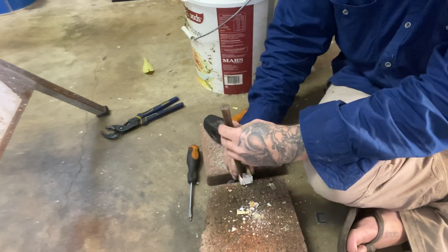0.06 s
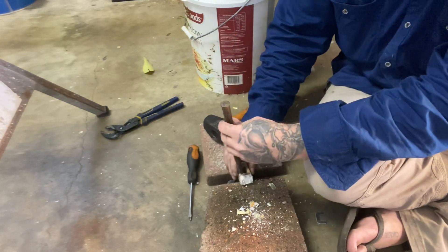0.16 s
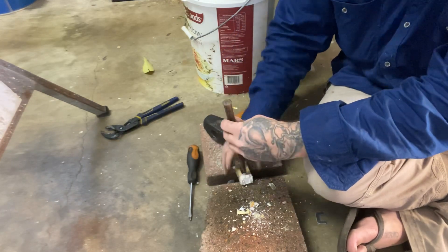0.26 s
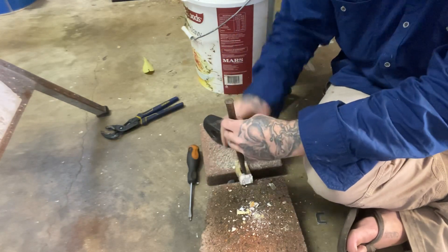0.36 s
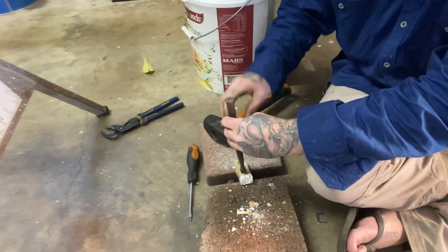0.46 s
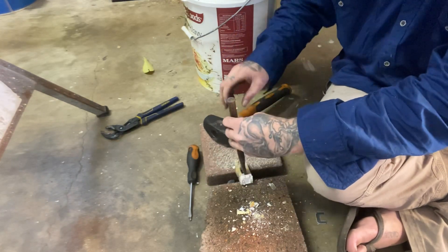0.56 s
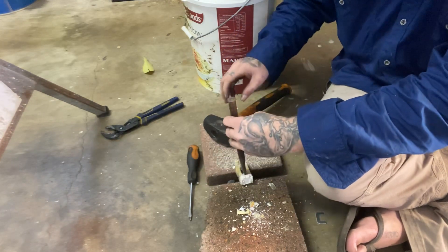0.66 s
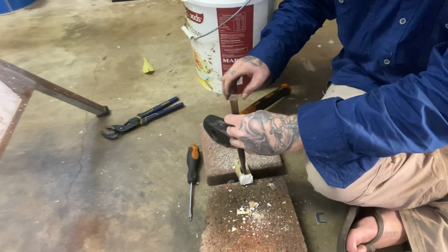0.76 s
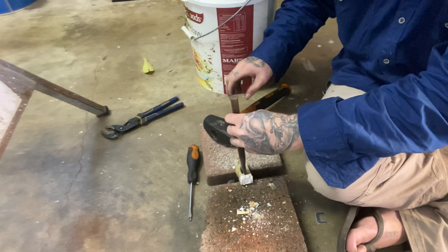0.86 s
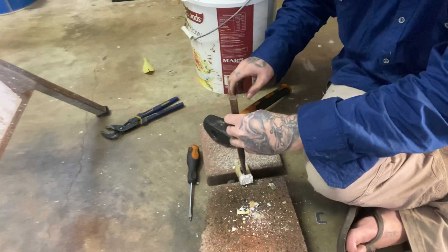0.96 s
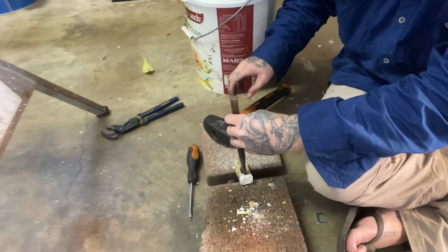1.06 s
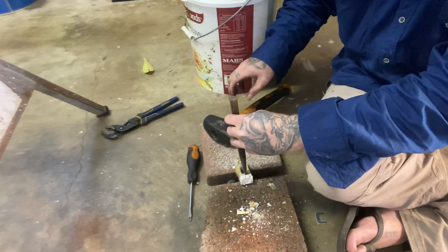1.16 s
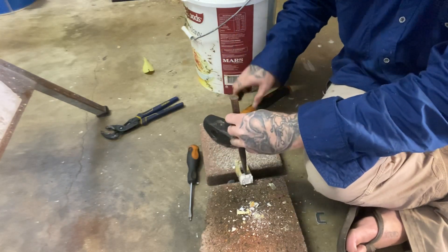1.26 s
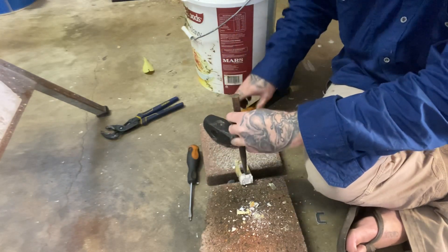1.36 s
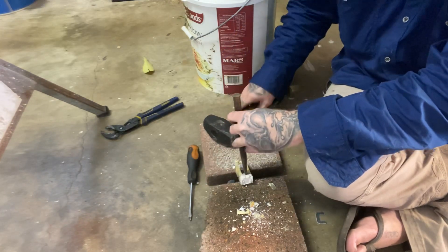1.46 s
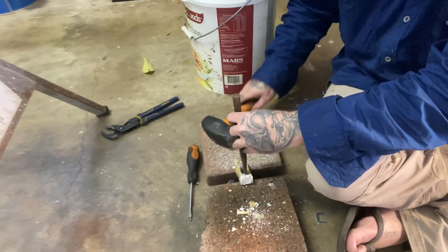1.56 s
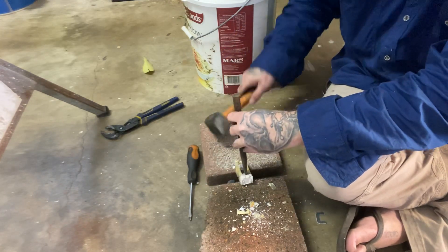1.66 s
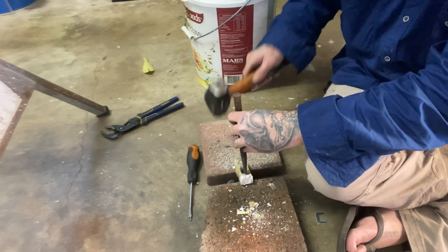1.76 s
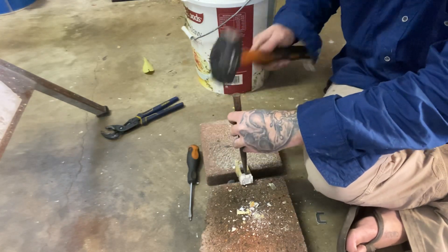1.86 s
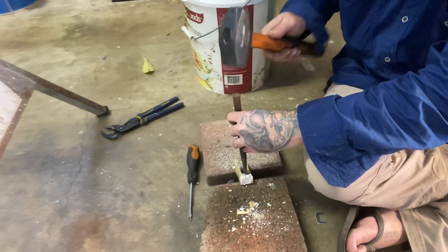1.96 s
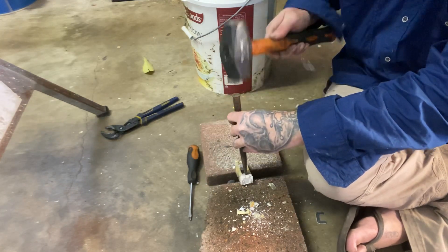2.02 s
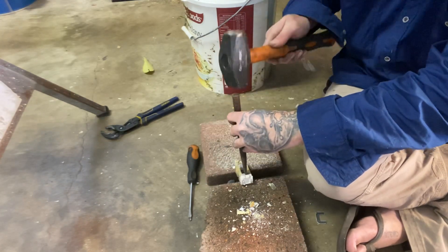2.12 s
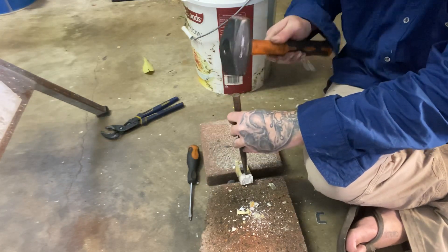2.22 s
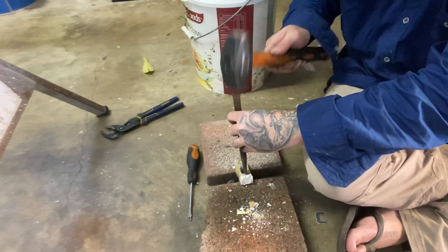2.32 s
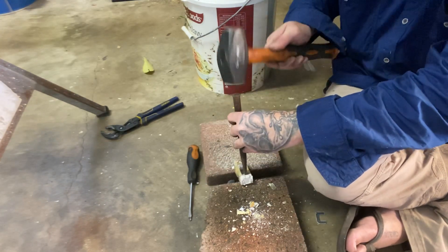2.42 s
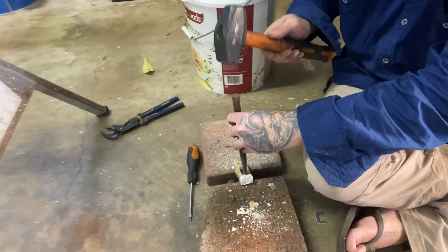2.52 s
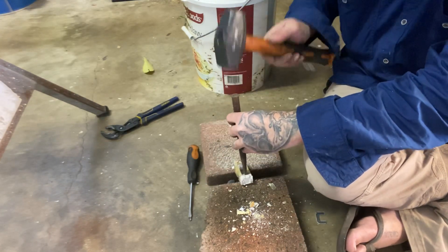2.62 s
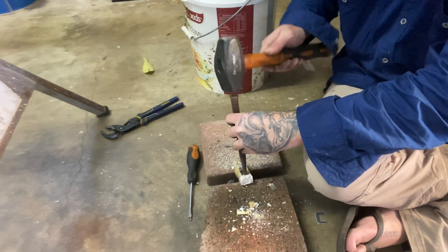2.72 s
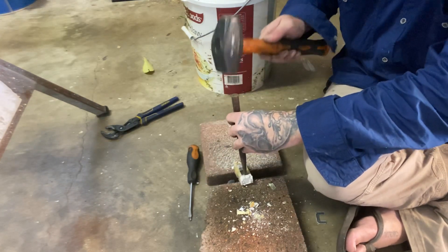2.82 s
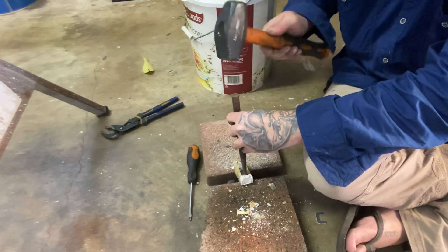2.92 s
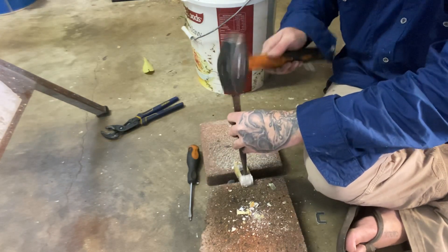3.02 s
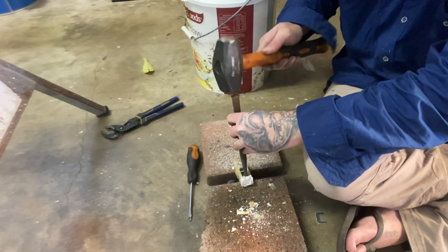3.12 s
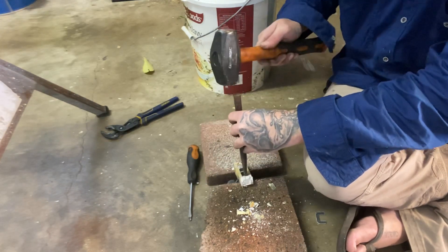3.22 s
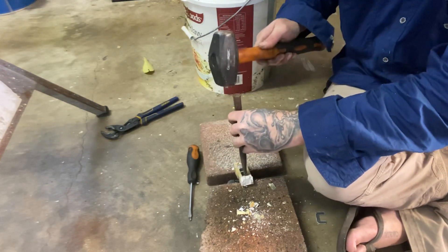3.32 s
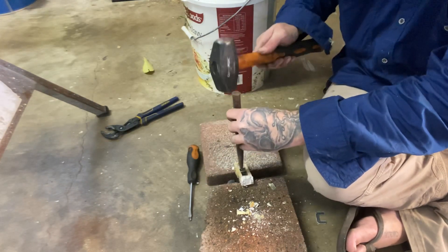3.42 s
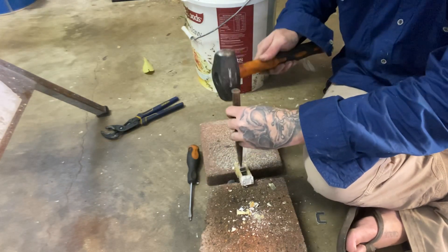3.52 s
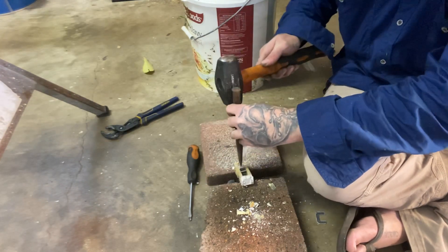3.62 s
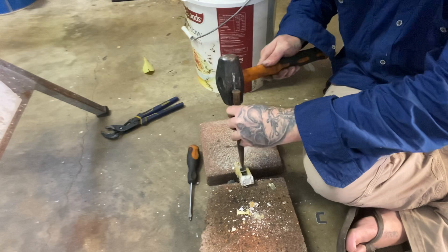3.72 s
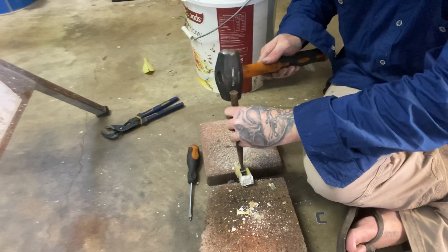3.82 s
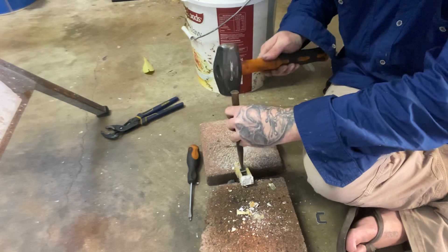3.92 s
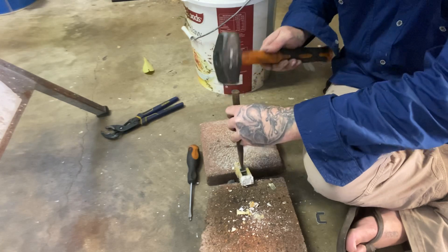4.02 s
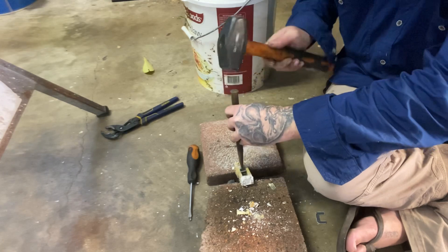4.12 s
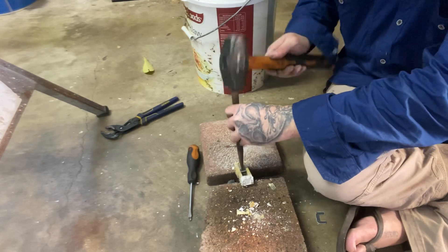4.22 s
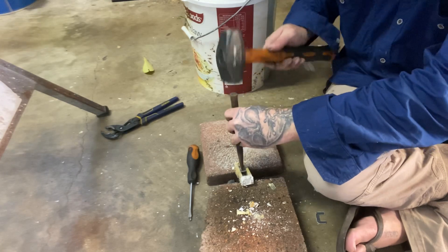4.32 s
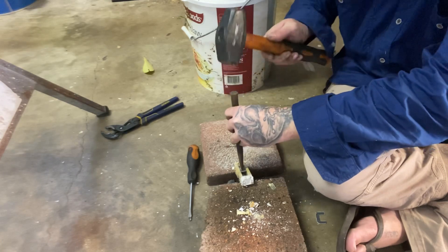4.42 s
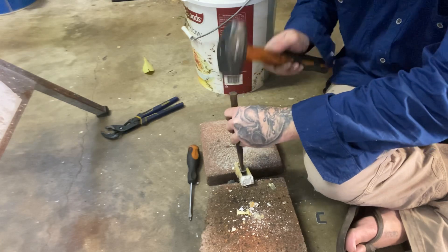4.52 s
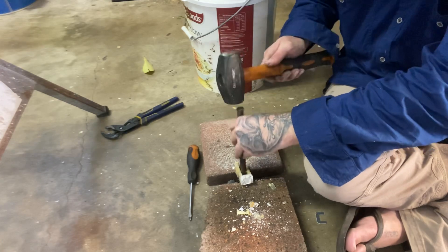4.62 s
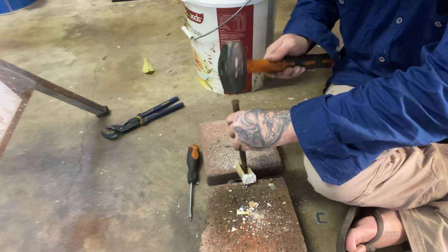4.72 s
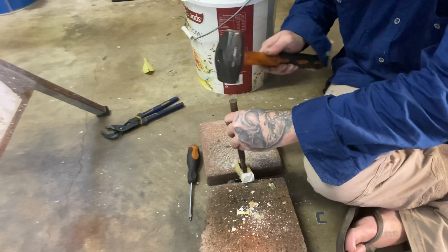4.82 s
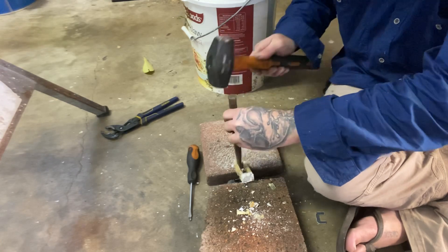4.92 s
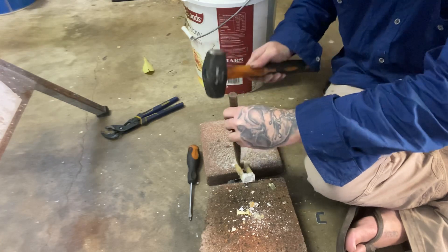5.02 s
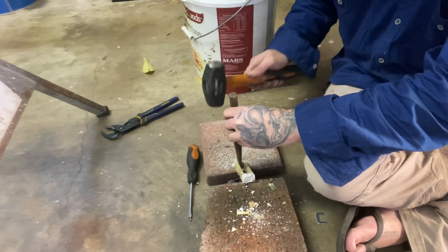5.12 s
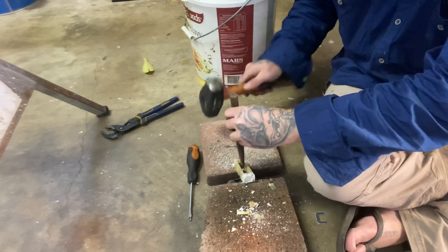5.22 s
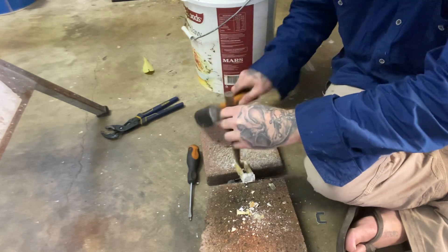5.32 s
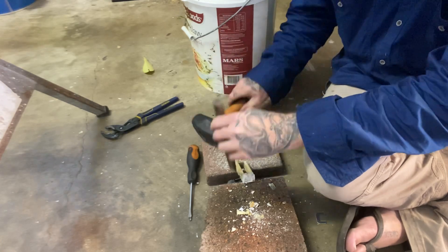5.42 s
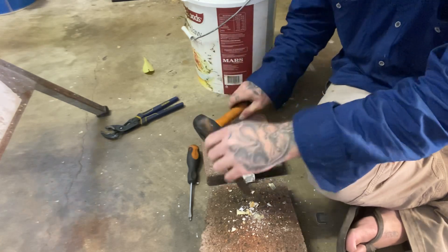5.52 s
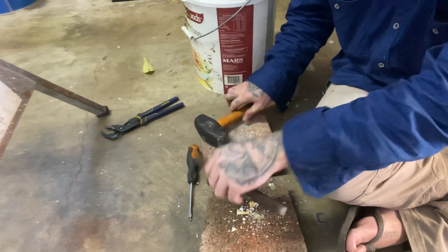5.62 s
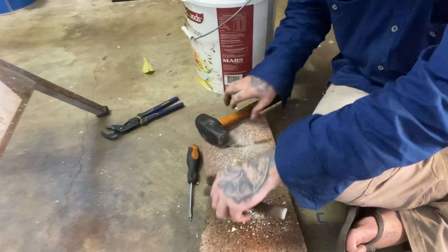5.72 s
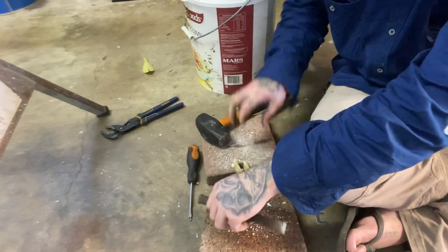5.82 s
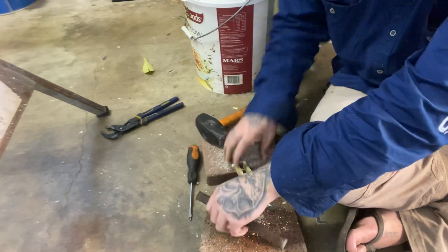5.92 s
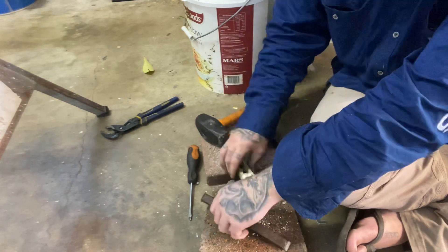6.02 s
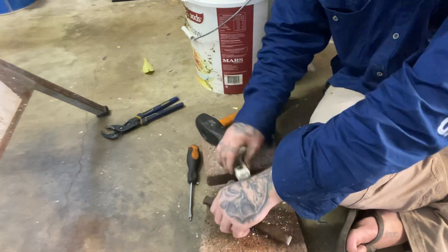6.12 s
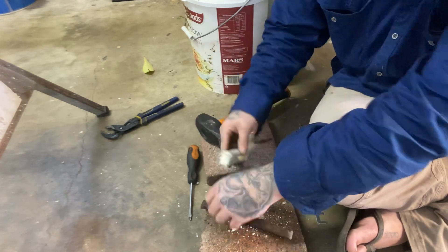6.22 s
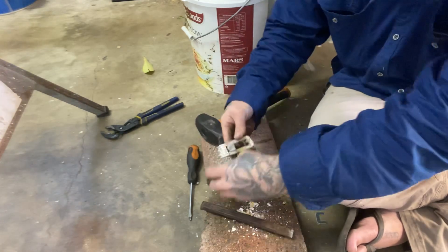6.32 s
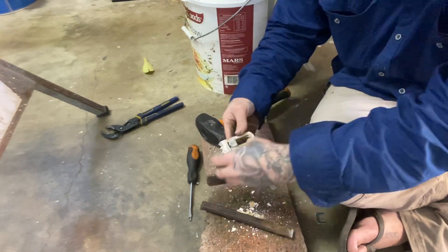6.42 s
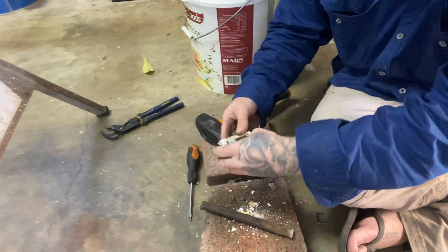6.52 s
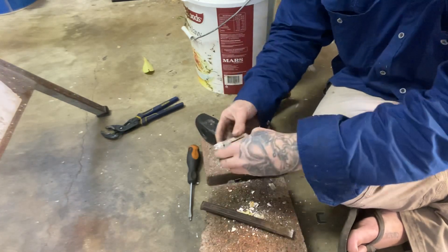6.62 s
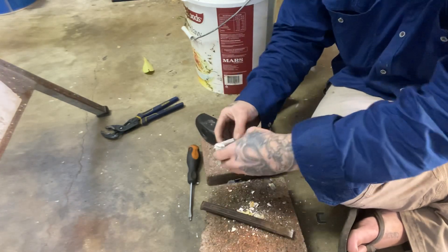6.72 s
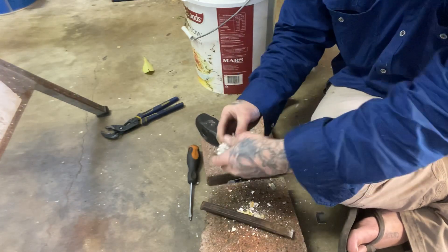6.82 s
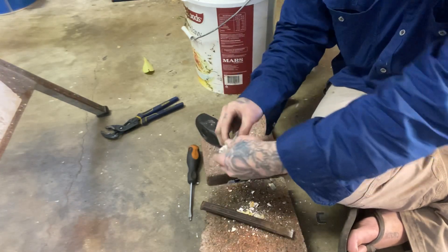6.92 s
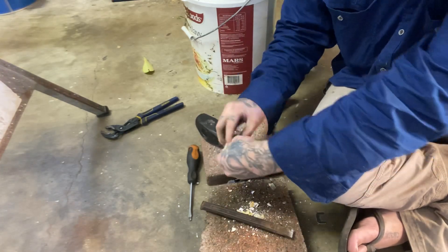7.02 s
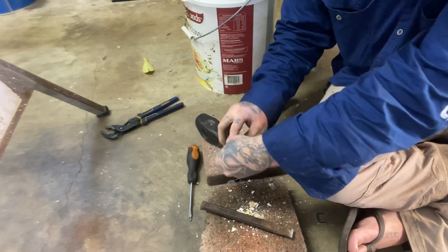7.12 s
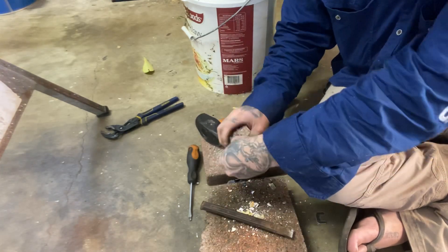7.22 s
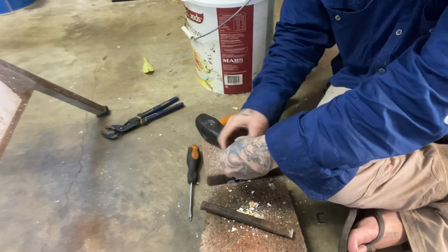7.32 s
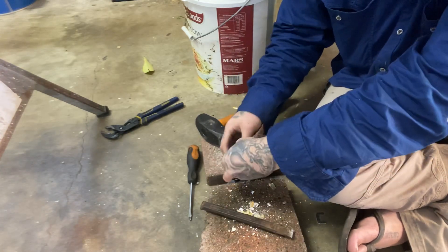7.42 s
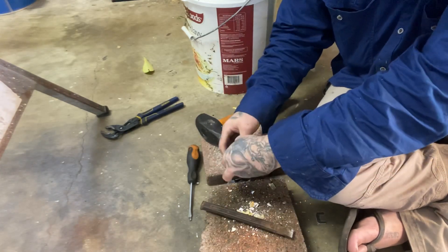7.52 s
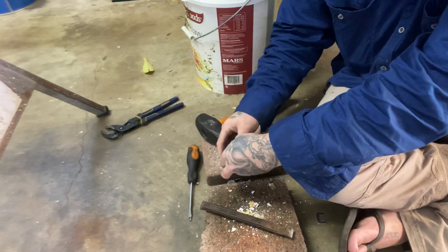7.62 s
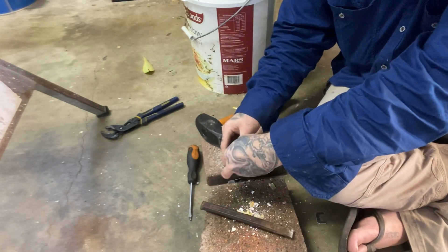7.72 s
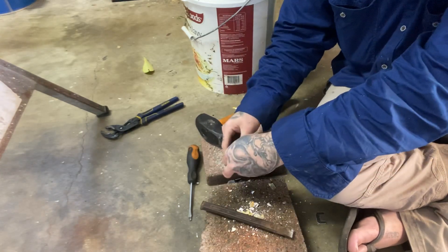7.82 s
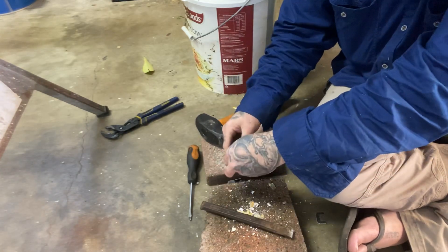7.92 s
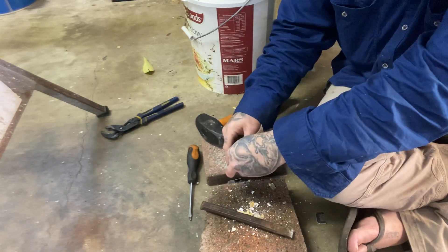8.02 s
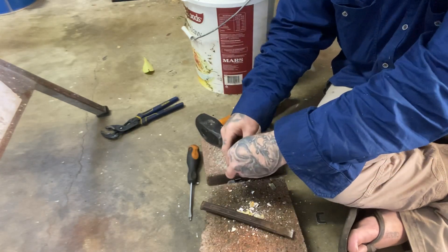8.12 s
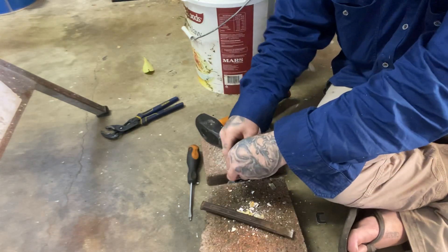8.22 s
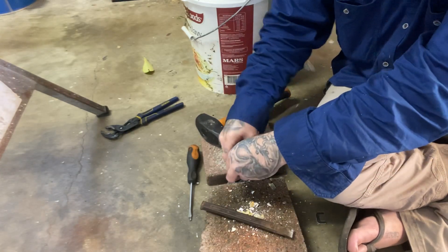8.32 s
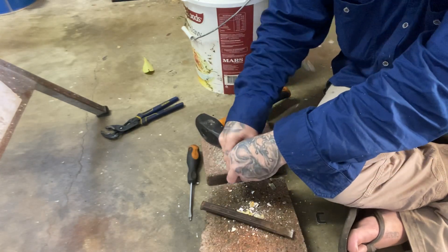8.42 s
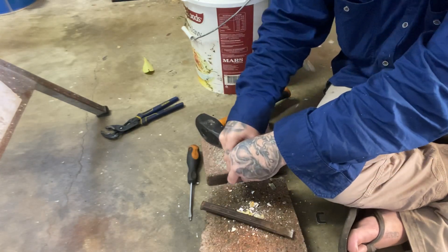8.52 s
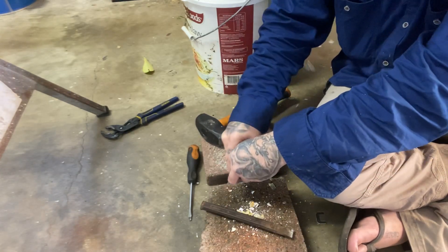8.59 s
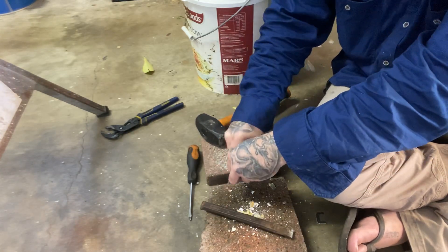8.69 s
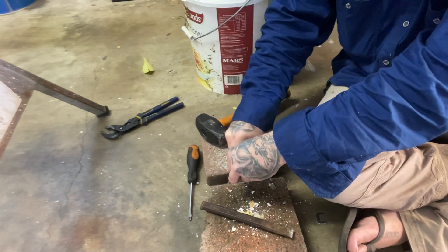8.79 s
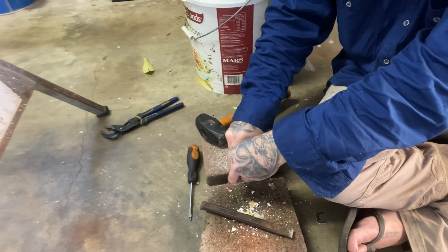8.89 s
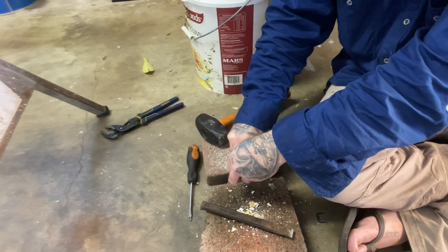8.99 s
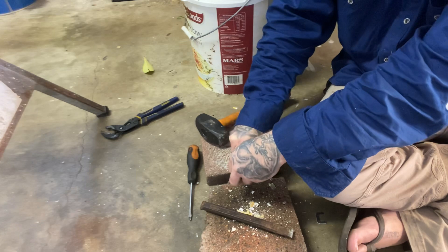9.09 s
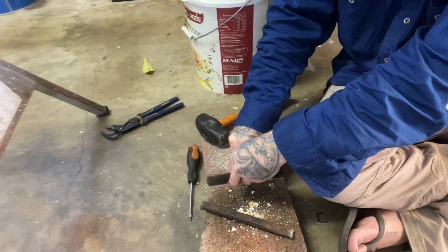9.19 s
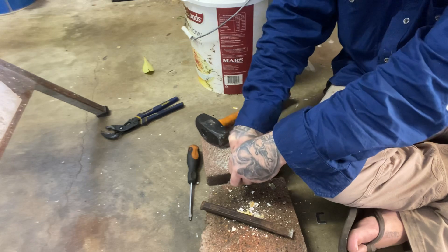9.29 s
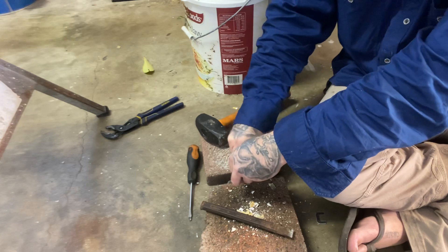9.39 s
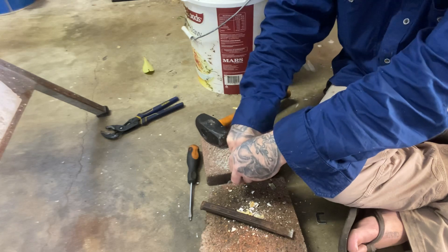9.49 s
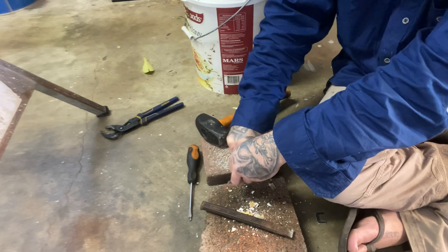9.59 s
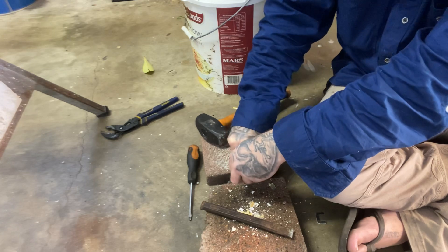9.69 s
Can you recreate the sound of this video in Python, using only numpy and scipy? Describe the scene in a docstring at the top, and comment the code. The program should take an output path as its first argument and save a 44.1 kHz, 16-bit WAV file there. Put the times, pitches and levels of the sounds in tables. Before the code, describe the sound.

A low hum and still air fill a bare garage with a short echo. For the first two seconds a faint bird rasps four times outside, while tools bump softly and one knocks down at about 1.6. At 2.4, 2.7 and 3.0 a hammer strikes a chisel held on a small metal casing on brick: each blow is a sharp steel crack with a brief ring, a brick knock and a floor thud. A light tap comes at 3.7, then two more blows at 4.2 and 4.6. Grit and metal splinters tinkle after each group. The hammer is put down with loud knocks around 5.5 and 5.7. The chisel drops at about 6 and rings brightly for a second. Afterwards there are only faint clicks, soft bumps, sleeve rustle and small scrapes on brick until about 9.5, with one more bird call near 7.4.

```python
"""A faint bird rasps outside a garage, over a low hum and the soft bumps of tools being handled.
Then a club hammer drives a cold chisel into a small metal casing on a brick: steel cracks, the brick
knocks, the concrete floor thuds, grit and splinters scatter. The hammer is put down, the chisel drops
and rings, and fingers pick at the casing with faint clicks. The bare room echoes it all."""
import sys
import numpy as np
from scipy import signal
from scipy.fft import rfft, irfft
from scipy.io import wavfile
from scipy.ndimage import uniform_filter1d

SR = 44100
rng = np.random.default_rng(int(sys.argv[2]) if len(sys.argv) > 2 else 0)


def wav_record(signal):
    """Record a signal, one row per channel, as 16-bit PCM in the file named by sys.argv[1]."""
    frames = np.transpose(np.atleast_2d(signal))
    bounded = np.clip(frames, -1, 1)
    # unit amplitude maps onto the largest positive 16-bit level
    quanta = np.round(bounded * 32767).astype(np.int16)
    wavfile.write(sys.argv[1], SR, quanta)


N = 429975

# garage reverberation: band_hz, level_db, t60_s
ECHO_BANDS = [(61, 4, 0.93), (160, 3.5, 0.51), (426, 3, 0.53), (1180, -5, 0.47), (2880, -0.5, 0.61),
              (7700, -2.5, 0.5), (15470, -10, 0.62)]
# microphone shading: freq_hz, left_minus_right_db
MIC_BALANCE = [(100, 4.5), (1000, 0), (2200, -4.5), (4500, -9), (8500, -1.5), (15000, -1)]

# modes: freq_hz, gain_db, t60_s
ROOM_MODES = [(71.4, -60, .7), (111, -58, 0.33), (165, -60.5, .3), (197, -59.5, 0.37), (278, -62, .45),
              (310, -65.5, 0.53), (362, -62.5, 0.35), (519, -61.5, 0.43), (570, -61.5, 0.63)]
SPLINTER_MODES = [(8075, -17, .15), (10873, -12, .16), (10760, -13, .11), (14883, -3, .16), (15040, 4, .14)]
HELD_CHISEL_MODES = [(1826, -7, 0.19), (1960, -16, 0.065), (2100, -12, .22), (2190, -7.5, .22),
                     (2290, -5.5, 0.099), (2506, 5, .09), (4583, -16, .26), (4990, -17.5, 0.084),
                     (5260, -16, .16), (6400, -16.5, 0.35), (6380, -13.5, .27), (8240, -15, .22),
                     (14150, -20.5, .22)]
# free chisel: freq_hz, tip_hit_db, flat_hit_db, t60_s, left_minus_right_db
FREE_CHISEL_MODES = [(1822, -3, -10.5, .24, -3), (2482, -13, -14, .95, -4), (3033, -22, -23, .4, 0),
                     (4688, -3.5, -5.5, 1.2, -6), (6335, -8, -19, .85, -4), (8037, -26, -26, .45, 0),
                     (8340, -2.5, -15, .3, 1), (11535, -31, -35, .5, 0), (15500, -34, -42, .4, 0)]
# brick and concrete: pitch_ratio, gain_db, t60_at_1khz_s
BRICK_MODES = [(0.631, -16, 0.035), (.85, -4, 0.02), (1.001, 11, 0.015), (1.169, -6, 0.018),
               (1.45, -10.5, 0.014), (1.75, -6, 0.013)]

# spectra: freq_hz, gain_db
AIR_EQ = [(20, -25), (45, -16.5), (75, 0.5), (134, -19), (204, -21), (285, -32.5), (422, -34), (1000, -39),
          (1400, -40), (4000, -46), (7500, -53.5), (10000, -53), (16000, -75.5)]
SLEEVE_EQ = [(60, -11.5), (200, -7), (400, 2), (650, -17.5), (1100, -14.5), (1800, -16), (4000, -19),
             (10000, -35)]
BUMP_EQ = [(40, -25.5), (100, -2), (190, 1), (290, -3.5), (400, 3.5), (560, -17), (1100, -22.5),
           (2200, -38), (6000, -54)]  # flesh and wood on brick
CLICK_EQ = [(200, -40), (700, -8.5), (2200, -3), (3500, -7), (6000, -10.5), (10000, -11), (13000, -25),
            (15500, -12)]
SLAB_EQ = [(30, -16), (70, 6.5), (110, 4.5), (180, -6), (330, 0), (900, -7.5), (1600, -24), (4000, -49)]  # concrete under a heavy tool
FLOOR_THUD_EQ = [(25, -34.5), (50, -10.5), (105, 2.5), (160, -6), (300, 0.5), (450, -3.5), (800, -13),
                 (1600, -29), (5000, -50.5)]
CRACK_EQ = [(30, -39), (150, -30), (600, -10.5), (1300, 2), (2100, 5), (3300, -5.5), (5000, -2),
            (6400, -0.5), (7400, -14), (8400, -8.5), (11000, -18.5), (12800, -32), (14500, -20),
            (16000, -18.5)]
AIR_SIDE_EQ = [(60, -9.5), (300, .5), (1500, 1)]
WHEEZE_EQ = [(900, -34), (2000, -8), (3600, 5.5), (5000, -8), (6200, -8), (12000, -35.5)]
RUB_BODY_EQ = [(250, -14), (420, 7), (700, -4), (1000, -2), (1350, -16.5), (1800, 4)]
RUB_TREBLE_EQ = [(2300, -4), (2700, 0), (3200, -6), (4000, -1), (4700, -4.5), (7000, -13), (14000, -48)]
BUMP_CLACK_EQ = [(1300, -3.5), (4000, -14)]
SPLINTER_TICK_EQ = [(500, -12), (2000, -8.5), (6000, 1.5), (11000, -1), (16000, -1)]
SOFT_CLACK_EQ = [(250, -3), (800, -3.5), (1800, 5), (4000, -8.5), (9000, -26)]
SOFT_CRACK_EQ = [(300, -6), (1700, 8.5), (2400, -3.5), (3000, 4), (3800, -1.5), (4500, -8.5),
                 (6000, -16.5), (10000, -33.5), (16000, -47.5)]
BRICK_EQ = [(150, -14.5), (500, -4.5), (1000, .5)]  # too small to radiate much bass

# bird calls: start_s, length_s, top_pitch_hz, level_db, second_voice_rel_db, octave_rel_db
BIRD_CALLS = [(0.023, 0.31, 3085, -54.5, 2.5, 1), (0.732, 0.23, 2994, -52.5, -3, 2),
              (1.261, 0.31, 2953, -56, -1.5, 3), (1.913, 0.18, 2736, -54.5, -20.5, 11),
              (3.57, .16, 2640, -72.5, -9, -24), (7.418, .3, 3143, -54.5, 4, -3.5)]
# arm movements: peak_s, level_db, rise_s, fall_s
REACHES = [(.02, -69, 0.28, 0.43), (1.2, -63, 0.27, 1.37), (3.9, -77.5, 0.33, 1.25),
           (4.88, -66, 0.095, 0.18), (5.4, -65.5, 0.19, 1.4), (7.3, -65.5, 0.58, 0.78),
           (9.3, -77, 0.95, 0.64)]
# casing slid over the brick: start_s, length_s, level_db, treble_db
RUBS = [(6.462, 0.14, -71.5, 12), (7.88, 0.052, -71, 3), (8.0, 0.055, -78, 12), (8.257, 0.07, -72, 2.5),
        (8.719, 0.63, -71.5, -26), (9.143, 0.3, -65.5, -0.5)]
# hands, handle and shaft bump: start_s, level_db, clack_rel_db, t60_s
BUMPS = [(0.218, -53.5, -37, 0.029), (0.581, -53.5, -9, 0.039), (1.099, -49.5, -20, 0.11),
         (1.22, -39, -11, 0.074), (1.409, -50, -26, 0.18), (1.600, -40.5, -26, 0.16),
         (2.047, -50.5, -18.5, 0.17), (6.106, -34, -4, 0.21), (6.829, -59, 0, 0.16),
         (7.154, -44, -5.5, 0.12), (8.757, -63, -9, 0.049)]
# casing snaps: start_s, level_db
SNAPS = [(.568, -57), (1.173, -64), (6.273, -55), (6.778, -59), (8.012, -53.5)]
# casing catches on the brick: start_s, level_db, release_after_s
CATCHES = [(7.3227, -43.5, .0062), (7.888, -56.5, .024)]
# splinters land: start_s, level_db
SPLINTER_LANDINGS = [(3.22, -47.5), (3.339, -40), (3.436, -54), (4.753, -51.5), (4.808, -35),
                     (4.930, -42.5)]
# steel set down: start_s, knock_db, knock_hz, thud_db, crack_db, rebound_after_s, rebound_rel_db
SET_DOWNS = [(1.6032, -30, 984, -46, -56, .045, -10.5), (5.4612, -13.5, 1064, -29, -23.5, 0.014, -4.5),
             (5.659, -21, 1090, -31.5, -39, 0.026, -11), (5.9498, -27.5, 783, -43, -31, 0.027, -17),
             (6.0989, -29, 1000, -47, -32.5, 0.026, -6.5)]
# chisel lands: start_s, level_db, flatness (0 tip, 1 flat), hand_damping_db_per_s, chatter_s
CHISEL_DROPS = [(5.9490, -22, 0, 75, .03), (6.0995, -25, 1, 0, .1)]
# hammer blows: start_s, crack_db, ring_db, brick_lag_s, crunch_db, crunch_t60_s,
# knock_db, knock_hz, thud_db
BLOWS = [(2.352, -19.5, -35, 0.0042, -22.5, .02, -12, 1180, -32.5),
         (2.697, -25.5, -36, 0.0027, -25, .02, -14, 1650, -20.5),
         (3.037, -18.5, -30, 0.0033, -21.5, .022, -17.5, 1723, -19),
         (3.7443, -57, -41.5, 0.0032, -63, 0.024, -53, 2273, -59),
         (3.933, -85, -60.5, 0.0022, -73.5, .02, -69.5, 2145, -64),
         (4.2334, -25, -33, 0.0076, -23, .1, -30, 1063, -38.5),
         (4.5709, -17.5, -26.5, .0142, -25.5, .02, -38.5, 1090, -40.5)]

SIDES = np.array([[1], [-1]])  # left, right


def undb(db):
    """Decibels to gain."""
    return 10 ** (np.asarray(db) / 20)


def lookup(table, hz, column=1):
    """Table column interpolated over log frequency."""
    rows = np.array(table, float)
    return np.interp(np.log(np.maximum(hz, 1)), np.log(rows[:, 0]), rows[:, column])


def colour(x, eq, size=4096):
    """Minimum-phase filter with the given spectrum."""
    cepstrum = irfft(np.log(undb(lookup(eq, np.fft.rfftfreq(size, 1 / SR)))))
    cepstrum[1:size // 2] *= 2
    cepstrum[size // 2 + 1:] = 0
    response = irfft(np.exp(rfft(cepstrum)))[:size // 2]
    return signal.oaconvolve(x, np.array(response, ndmin=x.ndim), axes=-1)[..., :x.shape[-1]]


def fade(t, t60_s):
    """Exponential decay, 60 dB in t60_s."""
    return np.exp(-np.log(1000) * t / t60_s)


def level(x, db):
    """Scales a hit to the energy of 10 ms at this level."""
    return x * undb(db) / np.sqrt(np.sum(x ** 2) / (SR / 100))


def add(track, start_s, x):
    """Mixes x into the track."""
    start = int(start_s * SR)
    count = max(0, min(x.shape[-1], N - start))
    track[..., start:start + count] += x[..., :count]


def waver(rate_hz, count):
    """Smooth random drift, spread near 1."""
    size = max(1, int(SR / rate_hz))
    drift = uniform_filter1d(uniform_filter1d(rng.standard_normal(2 * SR), size), size)
    return drift[:count] / np.std(drift)


def contact(t60_s, crunch):
    """One push, then a dying crush of tiny ones; crunch is their size against the push."""
    t = np.arange(SR // 2) / SR
    push = rng.standard_normal(len(t)) * fade(t, t60_s)
    push *= crunch / np.sqrt(np.sum(push ** 2))
    push[0] += 1
    return push


def ring(modes, push, detune=0.):
    """Damped modes driven by a push; detune is their random shift with grip and seating."""
    t = np.arange(int(SR * max(t60_s for _, _, t60_s in modes))) / SR
    body = 0
    for hz, db, t60_s in modes:
        shifted_hz = hz * (1 + detune * rng.standard_normal())
        body += undb(db) * fade(t, t60_s) * np.sin(2 * np.pi * shifted_hz * t)
    return signal.oaconvolve(push, body)[:len(push)]


def brick_knock(pitch_hz, push, detune=.042):
    """Brick rings low when driven whole, higher and shorter when only a corner gives."""
    modes = [(pitch_hz * ratio, db, t60_s / (pitch_hz / 1000) ** 2) for ratio, db, t60_s in BRICK_MODES]
    return ring(modes, push, detune)


def room_tone(air_db=-63, hum_hz=62.4, hum_width_hz=4.7, hum_db=-63):
    """Still air with a wavering low hum."""
    mid, side = colour(rng.standard_normal((2, N)), AIR_EQ)
    air = (mid + SIDES * colour(side, AIR_SIDE_EQ)) / np.std(mid)
    hum = rng.standard_normal(N)
    for q in (hum_hz / hum_width_hz, 2):
        hum = signal.lfilter(*signal.iirpeak(hum_hz, q, fs=SR), hum)
    return air * undb(air_db) + hum / np.std(hum) * undb(hum_db)


def garage_echo(x, early_db=-3, early_t60_s=.067, first_wall_s=.0025, mono_below_hz=260):
    """Near walls answer fast, a diffuse tail follows; the bass is alike on both sides."""
    t, hz = np.arange(SR) / SR, np.fft.rfftfreq(SR, 1 / SR)
    mid, side = rfft(rng.standard_normal((2, SR)))
    coherence = 1 / (1 + (hz / mono_below_hz) ** 2)
    field = mid * np.sqrt((1 + coherence) / 2) + SIDES * side * np.sqrt((1 - coherence) / 2)
    onset = np.minimum(t / first_wall_s, 1) ** 2
    early = undb(early_db) * fade(t, early_t60_s)
    centres_hz = np.geomspace(50, 16000, 12)
    response = 0
    for band_hz, weights in zip(centres_hz, np.eye(len(centres_hz))):
        band = irfft(field * lookup(np.c_[centres_hz, weights], hz))
        envelope = onset * (early + fade(t, lookup(ECHO_BANDS, band_hz, column=2)))
        response += band * envelope * undb(lookup(ECHO_BANDS, band_hz)) / np.sqrt(np.sum(envelope ** 2))
    return signal.fftconvolve(x[None], response, axes=1)[:, :N]


def standing_waves(x):
    """Low resonances between floor, ceiling and walls."""
    return ring(ROOM_MODES, x)


def microphones(x, right_lag_samples=1):
    """Sound reaches the right side later; the housing shades each side differently."""
    left = colour(x, [(hz, db / 2) for hz, db in MIC_BALANCE])
    right = colour(np.roll(x, right_lag_samples), [(hz, -db / 2) for hz, db in MIC_BALANCE])
    return np.array([left, right])


def bird(rise=.21, second_ratio=1.36, rasp=.028, second_rasp=.035, wobble=.02, flutter_db=3):
    """Harsh rising calls: the two sides of the syrinx sound different, jittering pitches."""
    out = np.zeros(N)
    for start_s, length_s, top_hz, db, second_db, octave_db in BIRD_CALLS:
        n = int(length_s * SR)
        progress = np.linspace(0, 1, n)
        glide = 1 - rise * np.maximum(1 - progress / .79, 0) ** 2
        pitch_hz = top_hz * glide * (1 + wobble * waver(45, n))
        first_hz = pitch_hz * (1 + rasp * waver(350, n))
        second_hz = pitch_hz * second_ratio * (1 + second_rasp * waver(600, n))
        phase1, phase2 = 2 * np.pi * np.cumsum([first_hz, second_hz], axis=1) / SR
        call = np.sin(phase1) + undb(-19) * np.sin(3 * phase1)
        call += undb(octave_db) * progress * np.sin(2 * phase1)
        call += undb(second_db) * (np.sin(phase2) + undb(-24.5) * np.sin(2 * phase2))
        wheeze = colour(rng.standard_normal(n), WHEEZE_EQ)
        call += undb(-9) * wheeze / np.std(wheeze)
        envelope = np.interp(progress, [0, .35, .75, 1], [.15, .7, 1, .082])
        add(out, start_s, undb(db + flutter_db * waver(70, n)) * call * envelope)
    return out


def sleeves(span_db=20):
    """Cloth brushes with each reach, moving span_db over the rise and over the fall."""
    t = np.arange(N) / SR
    swell = sum(undb(db - span_db * np.maximum((peak_s - t) / rise_s, (t - peak_s) / fall_s))
                for peak_s, db, rise_s, fall_s in REACHES)
    cloth = colour(rng.standard_normal(N), SLEEVE_EQ)
    return swell * cloth / np.std(cloth)


def rubbing(grain_db=4.6, drift_db=6.7):
    """Metal catches and slips on the grains of the brick."""
    out = np.zeros(N)
    for start_s, length_s, db, treble_db in RUBS:
        n = int(length_s * SR)
        progress = np.linspace(0, 1, n)
        slips = rng.standard_normal(n) * undb(grain_db * rng.standard_normal(n) + drift_db * waver(28, n))
        rub = colour(slips, RUB_BODY_EQ + [(hz, gain_db + treble_db) for hz, gain_db in RUB_TREBLE_EQ])
        arch = np.sqrt(4 * progress * (1 - progress))
        add(out, start_s, undb(db) * rub / np.std(rub) * arch)
    return out


def handling(clack_hz=1050):
    """Hands bump and shift the tools against the brick."""
    out = np.zeros(N)
    for start_s, db, clack_rel_db, t60_s in BUMPS:
        add(out, start_s, level(colour(contact(t60_s, crunch=12), BUMP_EQ), db))
        clack = brick_knock(clack_hz, contact(t60_s, crunch=4), detune=.13)
        add(out, start_s, level(colour(clack, BUMP_CLACK_EQ), db + clack_rel_db))
    return out


def casing_click(db):
    """One small click of the casing."""
    return level(colour(contact(.017, crunch=9.3), CLICK_EQ), db)


def fingers(release_rel_db=-3, picking_s=(8.04, 8.45), picks_per_s=8, pick_db=-70, scatter_db=2):
    """The casing snaps, catches and lets go, then ticks unevenly as it is picked at."""
    out = np.zeros(N)
    for start_s, db in SNAPS:
        add(out, start_s, casing_click(db))
    for start_s, db, release_after_s in CATCHES:
        add(out, start_s, casing_click(db))
        add(out, start_s + release_after_s, casing_click(db + release_rel_db))
    for start_s in np.arange(*picking_s, 1 / picks_per_s):
        late_s = rng.random() / picks_per_s / 2
        add(out, start_s + late_s, casing_click(pick_db + scatter_db * rng.standard_normal()))
    return out


def splinters(landings=3, hop_s=.043, hop_shrink=.52, hop_loss_db=10):
    """Metal slivers tinkle across the concrete in ever shorter, weaker hops."""
    out = np.zeros(N)
    for start_s, db in SPLINTER_LANDINGS:
        for hop in range(landings):
            tinkle = ring(SPLINTER_MODES, contact(.00023, crunch=.94), detune=.00092)
            tick = colour(contact(.011, crunch=1.65), SPLINTER_TICK_EQ)
            add(out, start_s, level(tinkle, db) + level(tick, db - 9))
            start_s += hop_s * hop_shrink ** hop
            db -= hop_loss_db
    return out


def grit(rate_per_s=700, t60_s=.4, spread_db=2.5, onset_s=.053):
    """Brick crumbs land as sparse, unequal ticks that die away."""
    t = np.arange(SR) / SR
    lands = rng.random(SR) < rate_per_s / SR
    ticks = lands * rng.standard_normal(SR) * undb(spread_db * rng.standard_normal(SR))
    return colour(ticks * fade(t, t60_s) * np.minimum(t / onset_s, 1), CRACK_EQ)


def hammer_rocking(start_s=5.683, t60_s=.16, level_db=-29):
    """The hammer head rumbles on the concrete as it rocks to rest."""
    out = np.zeros(N)
    add(out, start_s, level(colour(contact(t60_s, crunch=5.9), SLAB_EQ), level_db))
    return out


def setting_down():
    """Steel meets the ground and rebounds once; the soft contact dulls the clack."""
    out = np.zeros(N)
    for start_s, knock_db, knock_hz, thud_db, crack_db, rebound_s, rebound_db in SET_DOWNS:
        for delay_s, gain_db in [(0, 0), (rebound_s, rebound_db)]:
            clack = colour(brick_knock(knock_hz, contact(.018, crunch=.76)), SOFT_CLACK_EQ)
            thud = colour(contact(.15, crunch=3), SLAB_EQ)
            crack = colour(contact(.016, crunch=2), SOFT_CRACK_EQ)
            hit = level(clack, knock_db) + level(thud, thud_db) + level(crack, crack_db)
            add(out, start_s + delay_s, undb(gain_db) * hit)
    return out


def dropped_chisel(beat_hz=6.96, twin_db=-14.5, right_phase_rad=1.3):
    """The bar lands tip first, damped by the fingers, then falls flat and rings out."""
    out, t = np.zeros((2, N)), np.arange(2 * SR) / SR
    for hz, tip_db, flat_db, t60_s, pan_db in FREE_CHISEL_MODES:
        phase = 2 * np.pi * hz * t + np.array([[0], [right_phase_rad]])
        # two bending planes: each mode beats with a close twin that radiates the opposite pattern
        twin = SIDES * undb(twin_db) * np.sin(phase - 2 * np.pi * beat_hz * t)
        tone = undb(SIDES * pan_db / 2) * (np.sin(phase) + twin)
        for start_s, db, flatness, damping_db_per_s, chatter_s in CHISEL_DROPS:
            mode_db = db + tip_db + flatness * (flat_db - tip_db)
            decay = fade(np.maximum(t - chatter_s, 0), t60_s)  # chatter delays the free decay
            add(out, start_s, tone * undb(mode_db - damping_db_per_s * t) * decay)
    return out


def hammering(crack_t60_s=.0069, force_rise_s=.0058, full_ring_db=-29.5, grit_rel_db=-13.5):
    """Steel cracks, the held chisel rings; then the casing crunches, brick and floor take the blow."""
    out = np.zeros(N)
    force_ramp = np.minimum(np.arange(SR // 2) / SR / force_rise_s, 1)
    for start_s, crack_db, ring_db, lag_s, crunch_db, crunch_t60_s, knock_db, knock_hz, thud_db in BLOWS:
        crack = colour(force_ramp * contact(crack_t60_s, crunch=4.9), CRACK_EQ)
        clink = ring(HELD_CHISEL_MODES, contact(.002, crunch=.39), detune=.004)
        clink = colour(clink, [(2500, 0), (5000, ring_db - full_ring_db)])  # lighter blows ring duller
        add(out, start_s, level(crack, crack_db) + level(clink, ring_db))
        casing = colour(contact(crunch_t60_s, crunch=6), CRACK_EQ)
        clack = colour(brick_knock(knock_hz, contact(.015, crunch=.7)), BRICK_EQ)
        thud = colour(contact(.038, crunch=1), FLOOR_THUD_EQ)
        add(out, start_s + lag_s, level(casing, crunch_db) + level(clack, knock_db) + level(thud, thud_db))
        add(out, start_s, level(grit(), thud_db + grit_rel_db))  # driven harder, brick crumbles more
    return out


def scene():
    """Work near the floor, its echo and the still room; the bird arrives only via the walls."""
    blows = hammering()
    knocks = setting_down() + hammer_rocking()
    chisel = dropped_chisel()
    small_sounds = splinters() + fingers() + handling() + sleeves() + rubbing()
    to_walls = blows + undb(-1.5) * knocks + undb(1.5) * small_sounds + undb(-7) * chisel[0]
    echo = garage_echo(to_walls + bird())
    boom = standing_waves(blows + undb(1.5) * knocks + undb(-3.5) * small_sounds)
    return microphones(blows + knocks + small_sounds) + chisel + echo + boom + room_tone()


def record(dry, low_cut_hz=28, high_cut_hz=15900):
    """Thins the deepest bass, rounds the loudest peaks, cuts the top."""
    low_cut = signal.butter(1, low_cut_hz, "high", fs=SR, output="sos")
    high_cut = signal.ellip(8, .2, 70, high_cut_hz, fs=SR, output="sos")
    rounded = np.tanh(signal.sosfilt(low_cut, dry))
    return signal.sosfilt(high_cut, rounded)


dry = scene()
out = record(dry)
wav_record(out)
```